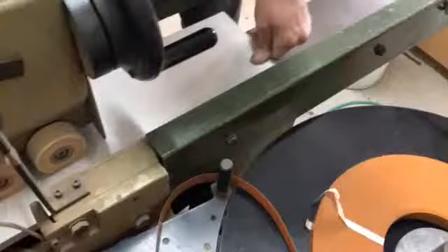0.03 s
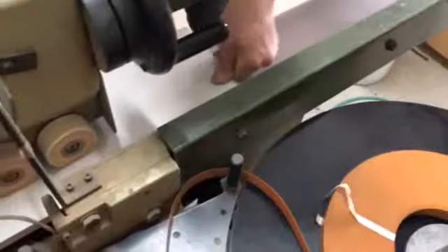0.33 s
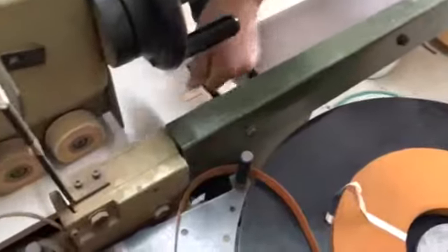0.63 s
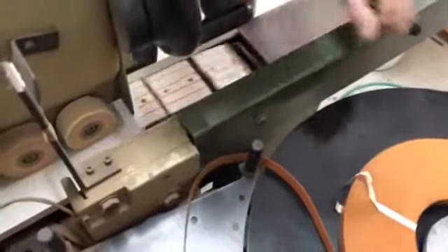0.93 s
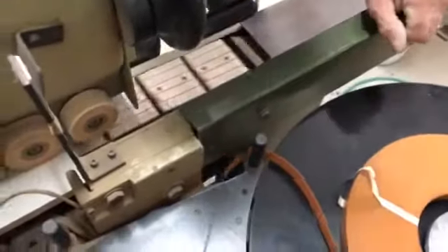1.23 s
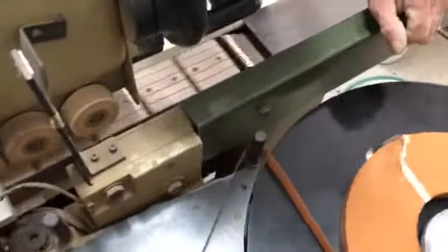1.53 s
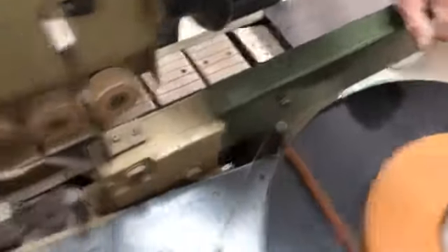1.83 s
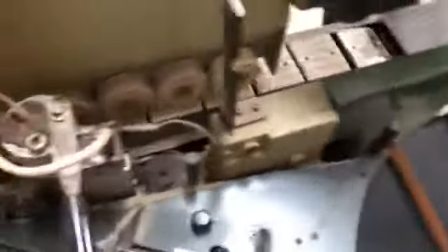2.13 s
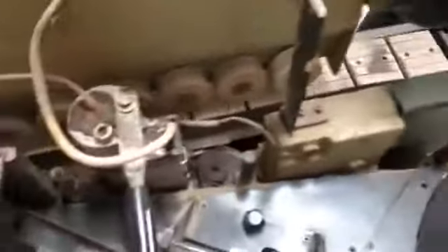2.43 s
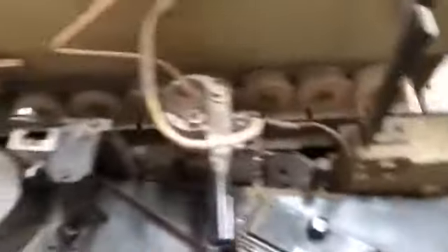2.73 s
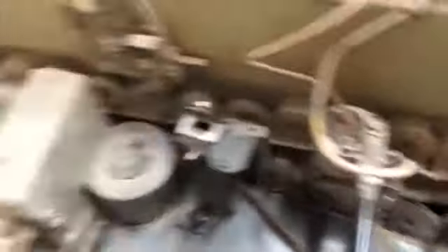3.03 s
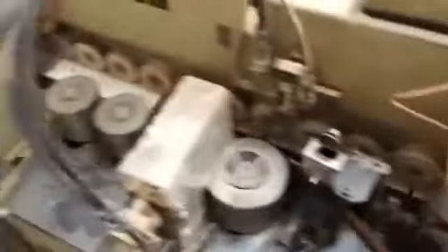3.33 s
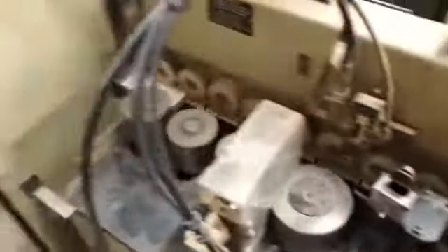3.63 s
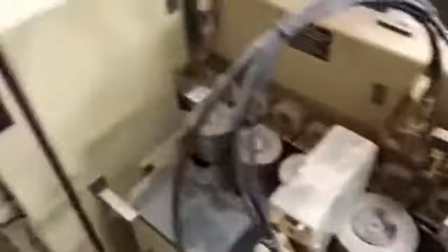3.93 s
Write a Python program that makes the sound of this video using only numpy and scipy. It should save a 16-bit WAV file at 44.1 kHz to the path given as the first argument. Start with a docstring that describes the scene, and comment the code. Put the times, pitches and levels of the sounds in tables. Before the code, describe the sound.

An edge banding machine whirrs and rumbles, with compressed air spits and steel clacks.

```python
"""In a workshop, an edge banding machine runs while the microphone moves along it towards the trimmers.
Cutters whirr, air rushes, the feed chain rumbles, motors hum and a fan whines. Valves spit compressed
air, steel stops clack, carriages thud in the frame and a roller sticks and slips with a brief squeal.
The recorder turns itself down under the loud air blasts and creeps back up after the long one."""
import sys
import numpy as np
from scipy import signal
from scipy.fft import rfft, irfft, next_fast_len
from scipy.io import wavfile
from scipy.ndimage import minimum_filter1d, map_coordinates

SR = 44100
rng = np.random.default_rng(int(sys.argv[2]) if len(sys.argv) > 2 else 0)


def digitize_waveform(pressure):
    """Quantize a signal to 16-bit integers and store it at the path in sys.argv[1].

    Rows of a 2-D input are taken as channels; values are limited to [-1, 1].
    """
    field = np.atleast_2d(pressure).T
    bounded = np.clip(field, -1, 1)
    quanta = np.round(bounded * 32767).astype(np.int16)
    wavfile.write(sys.argv[1], SR, quanta)


N = 176400
TIME = np.arange(N) / SR
PITCH_DRIFT = 0.00105  # how far motors and fan wander, as a share of their pitch

# how loud the running machine is (time [s], rumble [dB], whirr [dB])
MACHINE_LEVELS = [(.12, -30.5, -23.5), (.6, -26, -21), (1.2, -25, -20), (1.6, -27, -21), (2.2, -23, -18),
                  (2.55, -23.5, -16.5), (3.05, -26.5, -18.5), (3.3, -28.5, -23), (3.6, -29, -22),
                  (4, -31, -21.5)]


def amp(db):
    """Turn decibels into a volume factor."""
    return 10 ** (np.asarray(db) / 20)


def unit(x):
    """Scale a sound to an average strength (rms) of 1."""
    return x / np.sqrt(np.mean(x ** 2) + 1e-20)


def curves(rows):
    """One value per sample for each column after the time."""
    times, *columns = np.transpose(rows)
    return [np.interp(TIME, times, column) for column in columns]


def wobble(rate):
    """A smooth random curve through rate points a second."""
    return map_coordinates(rng.standard_normal(2048), [TIME * rate], mode="wrap")


def filtered(x, response):
    """Scale each frequency in x by response(hz)."""
    size = next_fast_len(N + SR // 4)
    return irfft(rfft(x, size) * response(np.fft.rfftfreq(size, 1 / SR)), size)[:N]


def colour(x, points):
    """Shape x by (frequency [Hz], level [dB]) points, at strength 1."""
    freqs, db = np.transpose(points)
    return unit(filtered(x, lambda hz: amp(np.interp(np.log(hz + 1), np.log(freqs + 1), db))))


def noise():
    """Plain white hiss."""
    return rng.standard_normal(N)


def band(centre_hz, octaves):
    """Noise that is strongest around one pitch."""
    return unit(filtered(noise(), lambda hz: 1 / (1 + (np.log2((hz + 1) / centre_hz) / octaves) ** 2) ** 2))


def blend(place, infeed, further):
    """Noise that fades from one colour to another between infeed and glue station."""
    far = np.clip(place, 0, 1)
    return np.sqrt(1 - far) * colour(noise(), infeed) + np.sqrt(far) * colour(noise(), further)


def envelope(start, rise, hold, fade):
    """Rise, hold, then die away; a fade time is the seconds taken to drop 60 dB."""
    age = TIME - start
    dying = np.exp(-np.log(1000) * np.maximum(age - rise - hold, 0) / fade)
    return np.clip(age / rise, 0, 1) * dying


def drifting_phase(hz, drift, rate):
    """The angle of a wave whose pitch wanders a little."""
    return 2 * np.pi * np.cumsum(hz * (1 + drift * wobble(rate))) / SR


def cutters(place):
    """Cutters and extraction air whirr, with one singing note and ticking chips."""
    # colour of the whirr at the infeed and further along (frequency [Hz], level [dB])
    whirr_infeed = [(600, -50), (1500, -11), (1900, -8.5), (2500, -8.5), (3600, -2), (4000, -2.5),
                    (4500, -.5), (5000, -4), (5650, -5), (6400, -9.5), (8500, -12), (11000, -14.5),
                    (12700, -17), (15500, -16)]
    whirr_further = [(600, -34), (1500, -10), (2300, -11), (3000, -6.5), (3700, -2.5), (4000, -2.5),
                     (4500, 0), (5100, -4), (6300, -8), (8500, -11), (11000, -14.5), (12700, -14.5)]
    # the note against the whirr (infeed [dB], glue station [dB], trimmers [dB])
    note_levels = [-15, -11, -8]
    note_hz, width_hz, chips_per_s = 4463, 45, 80
    _, whirr_db = curves(MACHINE_LEVELS)
    note = unit(filtered(noise(), lambda hz: 1 / (1 + ((hz - note_hz) / width_hz) ** 2)))
    note *= amp(np.interp(place, [0, 1, 2], note_levels))
    ticks = (rng.random(N) < chips_per_s / SR) * amp(5 * noise())
    chips = amp(-24) * colour(ticks, whirr_further)
    whirr = blend(place, whirr_infeed, whirr_further)
    return (whirr + note + chips) * amp(whirr_db + .4 * wobble(25.15))


def feed_chain(place):
    """The moving feed chain makes a low, slightly uneven rumble."""
    # colour of the rumble at the infeed and further along (frequency [Hz], level [dB])
    rumble_infeed = [(25, -38), (55, 9), (88, -22.5), (160, 5), (270, -2.5), (500, -3.5), (700, 1.5),
                     (1000, -3), (1280, 0.5), (1600, -15), (2400, -7), (5000, -80)]
    rumble_further = [(25, -24), (55, -10), (85, -2.5), (135, -2), (330, 0), (490, -4), (620, 2.5),
                      (820, -0.5), (1250, 1), (1600, -7.5), (2400, -14), (5000, -80)]
    rumble_db, _ = curves(MACHINE_LEVELS)
    return blend(place, rumble_infeed, rumble_further) * amp(rumble_db + 0.57 * wobble(29.89))


def motors(place):
    """Spinning motors and fans hum, each note louder or softer from place to place."""
    # humming notes (pitch [Hz], infeed [dB], glue station [dB], trimmers [dB])
    hums = [(59.8, -52, -47, -42), (117.5, -52, -33, -53), (168.6, -49, -66, -46.5),
            (178.2, -40.5, -39, -52), (199.4, -48, -65, -48), (237.3, -43, -37.5, -50),
            (305, -44.5, -35.5, -71), (330.3, -37.5, -45, -38.5), (359.8, -31.5, -32.5, -64),
            (446.6, -45.5, -36.5, -50), (598, -65, -36.5, -56), (682, -47.5, -41.5, -44),
            (749.5, -36, -38, -45), (905, -70, -36, -62), (2374, -61, -43, -44), (4465, -43, -35, -39),
            (6830, -52, -53, -56)]
    out = np.zeros(N)
    for hz, *levels in hums:
        phase = drifting_phase(hz, PITCH_DRIFT, rate=15) + rng.uniform(0, 2 * np.pi)
        out += amp(np.interp(place, [0, 1, 2], levels)) * np.sqrt(2) * np.sin(phase)
    return out


def valves():
    """Compressed air spits from the valves' exhaust ports."""
    # air blasts (time [s], level [dB], rise [s], hold [s], fade [s])
    blasts = [(1.2313, -9.5, 0.0009, 0.04, 0.23), (1.274, -7, 0.014, 0.02, 0.23),
              (2.372, -10.5, 0.0017, .003, .03), (3.103, -6.5, 0.0062, 0.0065, 0.022),
              (3.146, -25, 0.0026, .006, 0.033), (3.157, -8.5, 0.0025, 0.0029, 0.0087),
              (3.338, -13, 0.0033, 0.0044, 0.05), (3.384, -19.5, .003, .008, 0.045),
              (3.66, -8, 0.0013, 0.0014, .012), (3.677, -25, 0.0031, 0.0087, 0.074),
              (3.779, -20, 0.0039, .018, .08)]
    # colour of the escaping air (frequency [Hz], level [dB])
    hiss_colour = [(500, -42), (2500, -14), (4300, -4), (5000, 0), (5600, -1), (7000, -3), (8000, 0.5),
                   (10000, -2), (12500, -7), (15000, -2)]
    flow = sum(amp(db) * envelope(start, rise, hold, fade) for start, db, rise, hold, fade in blasts)
    return flow * colour(noise(), hiss_colour) * amp(0.75 * wobble(250))


def clacks():
    """Stops and rollers hit with a sharp crack, and the steel rings briefly."""
    # hits (time [s], level [dB], fade [s], centre pitch [Hz])
    hits = [(.686, -13.5, .028, 2900), (1.3235, -12, .06, 2000), (2.3725, -10.5, .016, 2000),
            (2.4026, -22, .025, 2500), (3.147, -17, .04, 3500), (3.161, -10, .012, 2200),
            (3.178, -21, .16, 550), (3.184, -16.5, .09, 3000), (3.309, -25, .03, 2200)]
    # ringing notes of the steel stops (pitch [Hz], level [dB], fade [s])
    steel_notes = [(1150, -6, .05), (1880, 0, .06), (2280, -2, .04), (3050, -3, .04), (5000, -6, .04)]
    out = np.zeros(N)
    for start, db, fade, centre_hz in hits:
        ring = np.zeros(N)
        for hz, note_db, note_fade in steel_notes:
            strength = amp(note_db + rng.normal(0, 0.67)) * envelope(start, 0.0015, 0, note_fade)
            ring += strength * np.sin(2 * np.pi * hz * (TIME - start))
        crack = band(centre_hz, octaves=1.3) * envelope(start, 0.00041, 0.00049, fade)
        out += amp(db) * (crack + amp(-13) * ring)
    return out


def thuds():
    """Carriages bump and the heavy frame shudders; low thumps also come with the big air blasts."""
    # bumps (time [s], level [dB], rise [s], fade [s], centre pitch [Hz]); the first two are low thumps as air
    # from the big blasts hits the microphone
    bumps = [(1.236, -19.5, 0.026, 0.14, 170), (3.122, -25, 0.011, .05, 80),
             (3.468, -17.5, 0.0031, 0.34, 855), (3.478, -19, 0.01, 0.43, 265),
             (3.512, -18.5, .008, 0.24, 88), (3.549, -24, 0.015, 0.51, 169)]
    return sum(amp(db) * band(hz, octaves=1) * envelope(start, rise, 0, fade)
               for start, db, rise, fade, hz in bumps)


def roller():
    """A roller sticks and slips: a thin squeal plus a softer note an octave up."""
    # spurts of squealing (time [s], length [s], level [dB])
    spurts = [(3.454, 0.0062, -19), (3.48, 0.045, -33), (3.57, 0.043, -28), (3.628, 0.056, -33),
              (3.683, .105, -27)]
    grip = sum(amp(db) * envelope(start, .004, length, 0.034) for start, length, db in spurts)
    phase = drifting_phase(hz=6693, drift=.0015, rate=120)
    return grip * amp(2.6 * wobble(50)) * (np.sin(phase) + amp(-10) * np.sin(2 * phase))


def fan():
    """Fan blades make a thin whine that comes and goes along the walk."""
    # loudness of the whine (time [s], level [dB])
    whine_levels = [(.2, -30), (.8, -36.5), (1.25, -37), (2, -27.5), (2.6, -39), (3, -35), (3.35, -32),
                    (3.9, -45)]
    db, = curves(whine_levels)
    phase = drifting_phase(hz=1177.3, drift=PITCH_DRIFT, rate=13)
    return amp(db + 0.54 * wobble(13)) * np.sqrt(2) * np.sin(phase)


def draughts():
    """Air from the big blasts pushes on the microphone, mostly heard as the recorder turning down."""
    # pushes of air (time [s], level [dB], rise [s], hold [s], fade [s])
    pushes = [(1.252, 1, 0.031, 0.013, 0.086), (3.114, -6.5, 0.0095, 0.0024, 0.028)]
    return sum(amp(db) * envelope(start, rise, hold, fade) for start, db, rise, hold, fade in pushes)


def workshop(x):
    """The room adds a short, blurred echo."""
    tail = (noise() * envelope(0.002, 0.0013, 0, fade=0.21))[:SR]
    return x + amp(-9) * signal.fftconvolve(x, tail / np.linalg.norm(tail))[:N]


def held(x, seconds):
    """The highest value of the last seconds."""
    size = int(seconds * SR) | 1
    return -minimum_filter1d(-x, size, origin=size // 2, mode="nearest")


def lagged(x, seconds):
    """Follow x smoothly, a little behind."""
    keep = np.exp(-1 / (seconds * SR))
    return signal.lfilter([1 - keep], [1, -keep], x)


def gain_control(x):
    """Loud sounds turn the volume down fast; a slower dip holds, then recovers steadily."""
    limit_db, react_s, recover_db_per_s = -14, .002, 7
    level_db = 10 * np.log10(lagged(x ** 2, react_s) + 1e-12)
    over_db = np.maximum(level_db - limit_db, 0)
    fast_db = lagged(held(over_db, seconds=.009), react_s)
    slow_db = held(lagged(fast_db, seconds=0.061), seconds=0.73)
    ramp = recover_db_per_s * TIME
    recovering_db = np.maximum.accumulate(slow_db + ramp) - ramp
    return amp(-np.maximum(fast_db, recovering_db))


def scene():
    """The whole machine, the same in both ears."""
    # the microphone's path (time [s], place [0 infeed, 1 glue station, 2 trimmers])
    walk = [(1.3, 0.45), (1.8, 0.61), (2.55, 1.05), (3.05, 1), (3.35, 2.4)]
    place, = curves(walk)
    shaft_hz = 59.5
    pulsing = 1 + .035 * np.sin(2 * np.pi * shaft_hz * TIME)  # one slight swell per turn
    running = pulsing * (cutters(place) + feed_chain(place)) + motors(place) + fan()
    bursts = workshop(valves() + clacks() + thuds())
    mono = running + bursts + roller() + draughts()
    return np.array([mono, mono])


def record(dry):
    """The recorder switches on, controls the volume and drops the deepest bass and highest treble."""
    start_s, bass_hz, top_hz = .12, 46, 15900
    wet = dry * gain_control(dry[0]) * (TIME > start_s)
    response = lambda hz: (hz < top_hz) * (1j * hz / (bass_hz + 1j * hz)) ** 4
    return np.array([filtered(channel, response) for channel in wet])


dry = scene()
out = record(dry)
digitize_waveform(out)
```